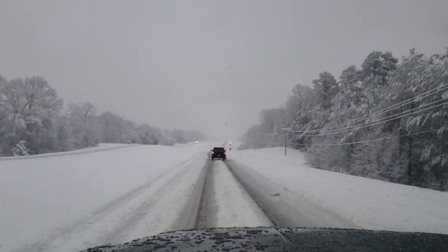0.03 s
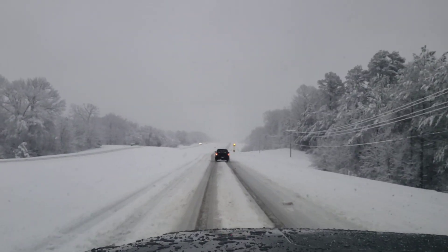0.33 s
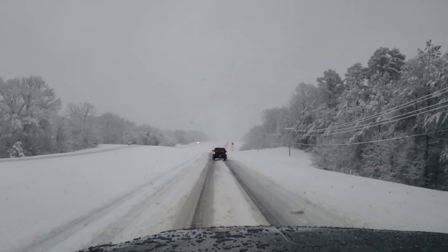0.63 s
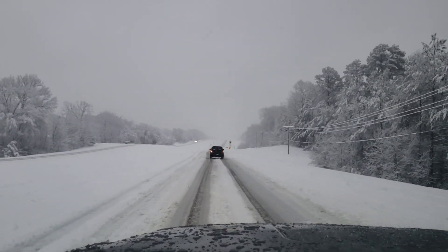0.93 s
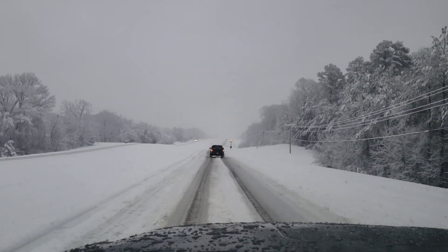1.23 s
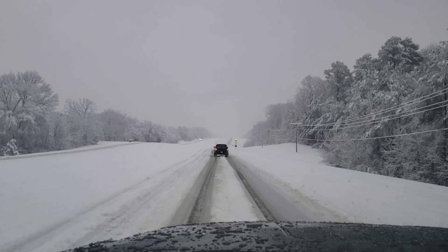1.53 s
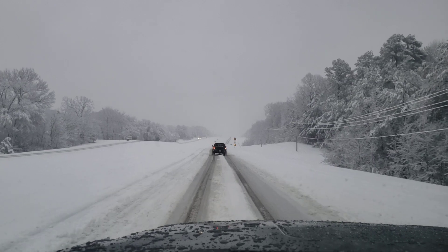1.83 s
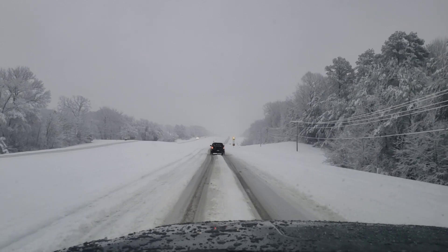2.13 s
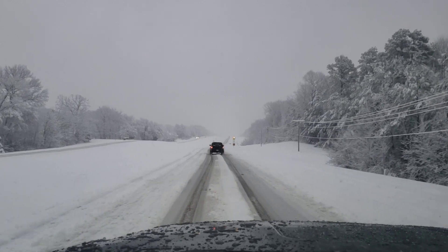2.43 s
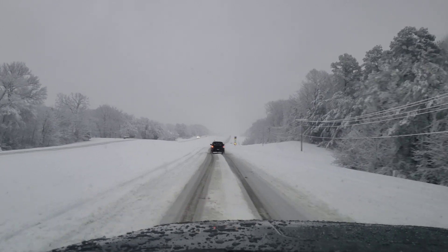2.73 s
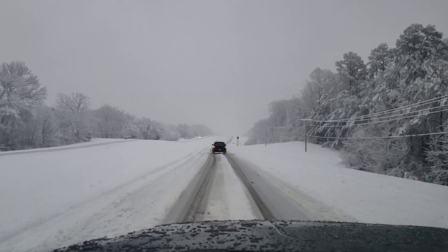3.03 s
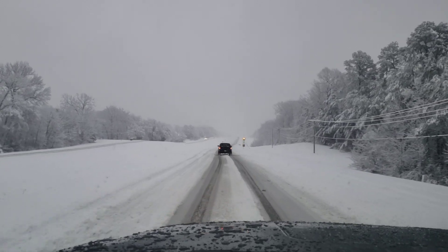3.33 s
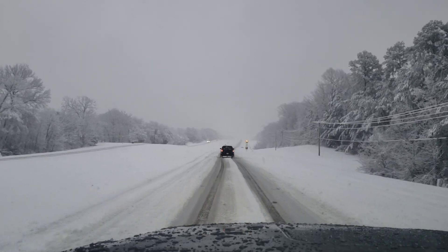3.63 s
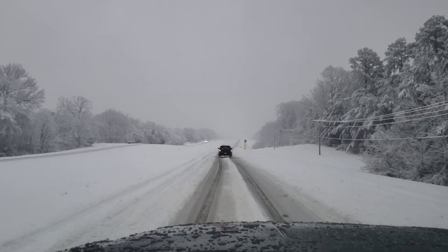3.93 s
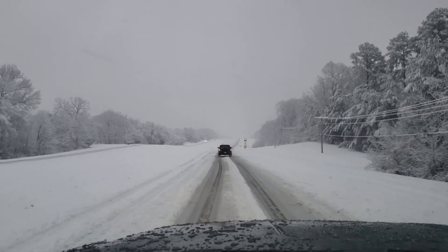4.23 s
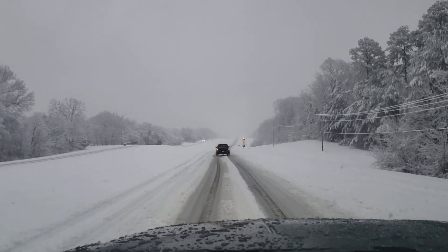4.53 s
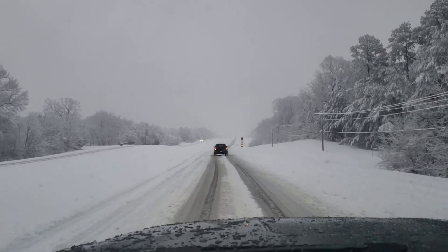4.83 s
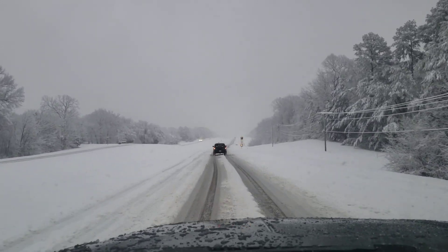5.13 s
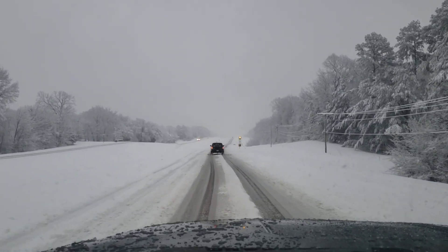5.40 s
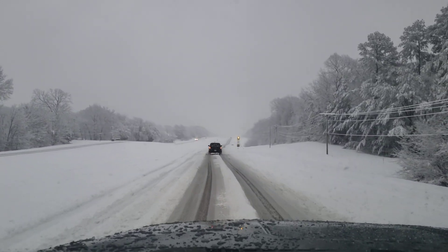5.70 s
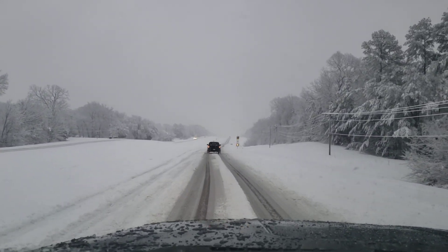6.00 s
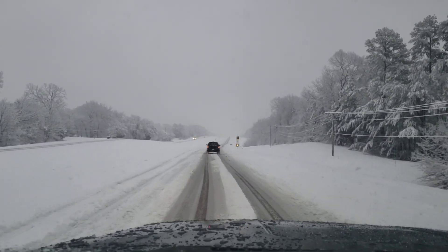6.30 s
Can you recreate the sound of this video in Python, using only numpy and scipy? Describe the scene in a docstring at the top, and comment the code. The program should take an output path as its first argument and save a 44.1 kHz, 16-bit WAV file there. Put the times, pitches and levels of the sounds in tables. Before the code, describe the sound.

Inside a car driving through slush: a steady deep rumble and wet tyre hiss, with drops ticking on the windscreen and ice hitting the body.

```python
"""Driving through slush

Inside a car, just behind the windscreen. The rough road shakes the cabin into a deep rumble,
and the turning engine and wheels hum through it. The tyres throw up countless wet grains,
which blur into a hiss. Drops tick on the glass, and gritty splashes and bits of ice hit the
body. Near the end, the right wheels plough into deeper slush."""
import sys
import numpy as np
from scipy import signal
from scipy.fft import rfft, irfft
from scipy.io import wavfile
from scipy.ndimage import uniform_filter1d

SR = 44100
rng = np.random.default_rng(int(sys.argv[2]) if len(sys.argv) > 2 else 0)


def to_wav(s):
    """Save 16-bit WAV."""
    ch = np.atleast_2d(s).T  # columns
    pcm = np.round(np.clip(ch, -1, 1) * 32767)  # PCM
    wavfile.write(sys.argv[1], SR, pcm.astype(np.int16))


N = 284886
TIME = np.arange(N) / SR
FREQS = np.maximum(np.fft.rfftfreq(N, 1 / SR), 1)
CUTOFF_HZ = 15700

# Rough packed snow. Each row: time in seconds, shaking in dB.
ROAD_SHAKING = [(0, -10), (.6, -4.5), (1.1, -0.5), (1.65, 0), (2.1, -0.5), (2.75, -2), (3.05, 0.1),
                (4.1, 2.5), (4.45, -2), (5.3, -2), (6.05, -1.5), (6.46, -2.5)]
# Ridges of snow. Each row: time in seconds, change in shaking in dB.
SNOW_RIDGES = [(1.65, 4.5), (4.62, 10), (4.82, 8), (5.5, -2)]
# Turning parts. Each row: time in seconds, turns per second, level in dB.
ENGINE_TURNS = [(0, 39, -36.5), (.4, 37.8, -39.5), (.8, 40.8, -40.5), (1.2, 39, -47), (2, 42.2, -46),
                (3, 39.9, -40), (4, 37.3, -38), (4.5, 37.7, -43), (5, 38, -42), (5.6, 37, -36),
                (6.46, 37.5, -38)]
WHEEL_TURNS = [(0, 13.7, -45), (.8, 12.1, -40.5), (1.5, 13.4, -39), (2.7, 12.54, -37.5), (3.7, 14.7, -41.5),
               (4.5, 12.3, -40), (5.5, 13.37, -37), (6.46, 12.7, -37.5)]
# Their tones. Each row: multiple of the turning speed, level in dB.
ENGINE_TONES = [(1, -25), (2, 0.5), (4, -10.5), (6, -13.5), (7, -16), (9, -22.5)]
WHEEL_TONES = [(2, -37), (3, -2), (4, -5.5), (5, 0), (6, -10), (12, -9.5), (14, -12), (16, -14),
               (21, -15.5), (25, -21)]  # from uneven tyres and tread blocks
# How alike left and right sound. Each row: frequency in Hz, likeness from 0 to 1.
SIDE_LIKENESS = [(60, 0.86), (160, 0.99), (270, 0.83), (450, 0.77), (800, 0.23)]

# Things that swell and fade. Each row: time in seconds, level in dB.
SLUSH_FLOW = [(0, -3.5), (.55, -2.5), (1.2, 0.8), (1.5, 0.2), (2.1, -1), (2.7, 0), (3.35, 0.5), (3.6, 0),
              (4.2, 0.2), (5.15, -0.1), (5.5, -0.84), (6.12, -0.3), (6.3, 1.5), (6.46, 1)]  # wet snow thrown up by the tyres
PLOUGH_LEVEL = [(6.1, -75), (6.18, -52), (6.24, -47), (6.32, -44), (6.38, -49), (6.44, -42), (6.46, -38)]
CRACKLE_LEVEL = [(0, -50), (.4, -56), (.6, -61), (.85, -51), (.97, -53), (1.2, -52), (1.45, -56),
                 (1.9, -53.5), (6.46, -56.5)]
PANEL_LEVEL = [(0, -59), (.45, -48), (1.3, -44.5), (2.1, -51), (2.85, -49), (3.6, -65), (5, -46.5),
               (6.46, -54.5)]
SHUDDER_LEVEL = [(0, -52), (1.2, -52), (1.68, -29), (2.15, -42), (2.8, -61), (3.1, -33.5), (3.5, -43),
                 (4.05, -36), (4.5, -53), (5.7, -53), (6.46, -41)]

# Spurts of sizzle from puddles. Each row: time in seconds, boost on the left in dB, boost on
# the right in dB, half length in seconds.
PUDDLE_SPURTS = [(1.383, -0.5, 2, .018), (4.76, 3, 3.5, .02), (4.98, 0, 2, 0.014), (5.106, -2, 4, 0.0087),
                 (5.165, 3, 5.5, 0.011), (5.998, 4.5, 3, 0.01)]
# Drops on the glass. Each row: start in seconds, level in dB, brightness in dB per octave,
# travel time of the 1000 Hz wave in milliseconds, then a boost in dB for each of the LANDING_BANDS.
GLASS_DROPS = [(0.3184, -10, -9, 2.06, -11, 0, 0, 0), (0.9955, -1.5, -8, 2.1, -3, -5, 7, 4),
               (1.563, -17, -5, 2.3, -9, 10, 2, 0), (2.2703, -1.6, -5.2, 2.35, -4.5, -3.5, 5, 5),
               (2.488, -0.5, -3.5, 2.1, 2, -7, 7, 5.5), (2.9253, -1.6, -2, 2.3, -3, -4, 5.5, 7),
               (3.268, -1.5, 0.3, 2.25, 10, 2.5, 0, -1.5), (3.4035, 0.7, -6.5, 2.7, -7, 4.5, -3, -3),
               (3.885, -1.7, -2, 2.1, 6, 5, 3, 2)]
# Pitch ranges whose strength depends on where a drop lands. Each row: centre in Hz, width in Hz.
LANDING_BANDS = [(442, 170), (655, 170), (800, 110), (1920, 130)]
# Slush on the body. Each row: time in seconds, splat in dB, crunch in dB, half length in seconds.
BODY_SPLASHES = [(1.927, -40.5, -52, 0.0074), (2.546, -41, -60, 0.0052), (4.582, -36.5, -47, 0.0079),
                 (4.623, -37, -50, 0.0084), (4.717, -37, -51, 0.0098), (4.744, -51, -42, 0.0065),
                 (4.765, -37, -42, 0.005), (4.798, -36, -40, 0.0039), (4.832, -33, -48, 0.008),
                 (4.992, -41, -43, 0.0051), (5.123, -35, -51, .005), (6.078, -35.5, -51, 0.007),
                 (6.28, -48, -49, 0.005), (6.375, -38, -53, 0.02)]
# Ice on the body. Each row: start in seconds, level in dB, pitch in Hz.
ICE_HITS = [(1.9235, -33, 1100), (4.5842, -39, 1500), (4.7165, -34, 1500), (4.767, -31, 1600),
            (4.7978, -30, 1750), (4.8035, -32, 1000), (4.8295, -30, 1200), (4.8383, -24, 1500),
            (4.9865, -33, 1400), (5.0005, -35, 1900), (5.1215, -31, 1100), (6.0827, -31, 1100),
            (6.1758, -24, 1250)]
# Gushes in deep slush. Each row: time in seconds, level in dB, half length in seconds.
SLUSH_GUSHES = [(6.21, -55, .006), (6.275, -47, 0.0078), (6.337, -38.5, 0.0058), (6.388, -55, 0.0063),
                (6.425, -44.5, 0.0083)]

# Pitches at which things ring. Each row: pitch in Hz, width in Hz, strength in dB.
GLASS_RINGS = [(449, 82, 6), (623, 21, -4), (768, 21, -6), (977, 110, -3.5), (1873.5, 120, 6.5),
               (3160, 370, -2.5), (3800, 380, -3.5)]
LEFT_RINGS = [(832, 53, -4), (1079, 87, 6.5), (1348, 66, -1), (1890, 220, -8.5), (2650, 46, -17)]  # glass and dashboard, as heard on each side
RIGHT_RINGS = [(1177, 18, 13), (1523, 91, 13), (1820, 360, 10), (2165, 200, 4.5), (2500, 150, -9),
               (4970, 150, -7.5)]

# A colour says how strong a sound's low and high parts are. Each row: frequency in Hz, level in dB.
BOOM_COLOUR = [(14, -31), (24, -17), (38, -15), (47, 1.5), (62, 6.5), (69, 8), (77, 12), (90, -0.5),
               (120, -5.5), (170, -21)]  # cabin air
DRONE_COLOUR = [(70, -6.5), (105, 2.5), (160, 0.5), (230, -3.5), (280, -9), (350, -13.5), (450, -16),
                (600, -26.5), (1000, -59)]  # body panels
LEFT_HISS_COLOUR = [(200, -6), (480, -5), (680, -8), (1100, -9.5), (1600, -2), (2300, -2.5), (2900, -12),
                    (3400, -12.5), (4000, -19.5), (5150, -21.5), (6300, -36.5), (7500, -62), (9500, -48),
                    (15700, -46.5)]
RIGHT_HISS_COLOUR = [(250, -18), (520, -9.5), (980, -15.5), (1300, -16), (1600, -22.5), (2500, -13.5),
                     (2750, -15.5), (3150, -26.5), (4500, -12), (5050, -12), (5700, -14.5), (6300, -26.5),
                     (6800, -41), (8000, -66)]
SPRAY_COLOUR = [(6400, -30), (6800, -12), (7400, -3.5), (8000, -2.5), (9100, -7), (10500, -4.5),
                (12000, 2.5), (13200, -5.5), (14400, -14), (14900, -27), (15400, -50)]
GLASS_COLOUR = [(200, -29), (320, -13), (430, -6), (600, -10), (700, -9.5), (800, -5.5), (1050, -2),
                (1170, -11.5), (1450, -6), (1900, -12.5), (2450, -11.5), (3300, -8.5), (4200, -12.5),
                (4450, -22), (5700, -16), (6200, -44), (7500, -64)]
SPLAT_COLOUR = [(400, -11), (750, 7), (1200, 12), (1800, 0), (2500, -5), (3300, -13), (5000, -29),
                (7000, -50)]
ICE_CRUNCH_COLOUR = [(1400, 4), (1800, 6), (2100, -5), (2500, 5.5), (3100, -6), (4200, -9), (6000, -32)]
DEEP_SLUSH_COLOUR = [(1000, -3), (1300, -1), (1600, -12), (2200, 3), (2550, 2), (2800, -7), (3200, -23),
                     (3600, -11), (4500, -4), (4800, -8), (5000, 5), (5350, -15), (5700, -5), (6300, -20),
                     (6800, -45)]
ARCH_GUSH_COLOUR = [(2200, -22), (2420, -4), (2540, -6), (2650, 0), (2850, -24)]  # the wheel arch ringing
ARCH_CRACKLE_COLOUR = [(1850, -22), (2060, -4), (2180, 3.5), (2290, -2), (2480, -21)]
PANEL_RING_COLOUR = [(245, -15), (272, 1), (290, -4.5), (325, -14)]
SUSPENSION_COLOUR = [(20, -12), (30, -5), (40, -3.5), (55, 1), (68, -18)]

# How a sound changes on its way. Each row: frequency in Hz, change in dB.
TICKS_TO_RIGHT = [(150, -12), (450, -29), (640, -39), (790, -17), (1000, -17), (2300, -21), (3200, -32),
                  (5000, -20), (7000, -10)]
PLOUGH_TO_LEFT = [(1100, 10), (1500, 2), (2200, -6), (2700, -5), (3300, -2), (4000, -10), (5000, -19),
                  (6800, -16)]
ICE_TO_CABIN = [(350, 2), (600, 0), (2300, -6), (3200, -10), (6000, -25)]


def road_rumble():
    """The road shakes the car: the air booms, and the panels drone more steadily."""
    shaking_db = in_time(ROAD_SHAKING)[0] + sum(db * bell(s, half_s=0.02) for s, db in SNOW_RIDGES)
    boom = from_db(-33 + shaking_db) * evened(cabin_noise(BOOM_COLOUR), span_s=0.18)
    drone = from_db(-37 + 0.27 * shaking_db) * evened(cabin_noise(DRONE_COLOUR), span_s=0.15)
    return boom + drone


def turning_hum(turns, tones, wander, flutter_db, flutter_hz):
    """A turning part hums at multiples of its speed, and each tone wavers in loudness."""
    speed, level_db = in_time(turns)
    angle = 2 * np.pi * np.cumsum(speed * (1 + wander * drift(2.68))) / SR
    hum = 0
    for multiple, db in tones:
        strength = from_db(db + flutter_db * drift(flutter_hz))
        hum += strength * np.sin(multiple * angle + rng.uniform(0, 2 * np.pi))
    return np.sqrt(2) * from_db(level_db) * hum


def tyre_hiss():
    """Countless slush grains hit the wheel arches in surges; water adds sizzle and fine spray."""
    flow_db, = in_time(SLUSH_FLOW)
    spurt_db = sum(np.outer(sides_db, bell(s, half_s)) for s, *sides_db, half_s in PUDDLE_SPURTS)
    surge_db = 0.72 * drift(10)
    left, right = grains(per_s=15000, spread_db=1.0) * from_db(surge_db + 0.36 * drift(30))
    # The left grains also reach the right side, a little later.
    right = rms_one(right + from_db(-10) * np.interp(TIME - .00028, TIME, left))
    hiss = np.array([coloured(left, LEFT_HISS_COLOUR), coloured(right, RIGHT_HISS_COLOUR)])
    hiss = rms_one(irfft(rfft(hiss) * [ringing(LEFT_RINGS), ringing(RIGHT_RINGS)], N))
    # With more slush, sizzle and spray grow faster than the hiss.
    treble = coloured(hiss, [(2300, 0), (CUTOFF_HZ, 0)])
    sizzle = (from_db(0.36 * flow_db + spurt_db) - 1) * treble
    spray = rms_one(coloured(grains(per_s=26000, spread_db=0), SPRAY_COLOUR))
    spray *= from_db(-67.5 + 1.4 * flow_db + 0.98 * spurt_db + surge_db)
    return from_db(-42 + flow_db) * (hiss + sizzle) + balanced(spray, left_db=-25, right_db=5.2)


def windscreen_ticks():
    """Drops of slush land on the glass, left of centre, and set it ringing."""
    blows = sum(drop(*row) for row in GLASS_DROPS)
    left = from_db(13.5) * irfft(blows * ringing(GLASS_RINGS) * struck(GLASS_COLOUR), N)
    right = coloured(left, TICKS_TO_RIGHT)
    ticks = placed(np.array([left, right]), pan_db=-0.5, lag_ms=-0.22)
    return with_echoes(ticks, count=6, earliest_s=0.00263, latest_s=0.016, echo_db=-26.5)


def drop(start_s, level_db, brightness_db, travel_ms, *boosts_db):
    """One drop's frequencies: it has its own loudness and brightness; its landing spot shapes them."""
    octaves = np.log2(np.clip(FREQS, 300, 5000) / 1000)
    blow = from_db(level_db + brightness_db * octaves) * delay(start_s)
    for db, (hz, width) in zip(boosts_db, LANDING_BANDS):
        blow *= 1 + (from_db(db) - 1) / (1 + 2j * (FREQS - hz) / width)
    # High notes cross the glass faster, so each tick chirps downward.
    phase = 4 * np.pi * travel_ms * np.sqrt(FREQS / 1000)
    direct = np.exp(-1j * phase)
    # The wave comes back from the rim, later and duller.
    from_rim = from_db(-12) * np.exp(-1j * phase * 1.887) / (1 + (FREQS / 2600) ** 2)
    return blow * (direct + from_rim)


def splashes():
    """Clumps of slush burst on the body: a dull splat on the left and a brighter crunch of ice."""
    splat = sum(from_db(db) * bell(s, half_s) for s, db, _, half_s in BODY_SPLASHES)
    crunch = sum(from_db(db) * bell(s, half_s) for s, _, db, half_s in BODY_SPLASHES)
    wet = evened(coloured(grains(per_s=6200, spread_db=1.0), SPLAT_COLOUR), span_s=0.0042)
    icy = evened(coloured(grains(per_s=2500, spread_db=0.5), ICE_CRUNCH_COLOUR), span_s=0.045)
    return balanced(splat * wet, right_db=-10) + balanced(crunch * icy, right_db=-2)


def ice_cracks():
    """Bits of ice hit the left side, each with a ring that dies almost at once."""
    path, cracks = struck(ICE_TO_CABIN), 0
    for start_s, db, hz in ICE_HITS:
        ring = 1 / (1 + 1j * (FREQS / hz - hz / FREQS))
        crack = irfft(path * delay(start_s) * ring, N)
        cracks += from_db(db) * crack / np.abs(crack).max()
    cracks = coloured(cracks, [(300, 0), (5500, 0)])
    return balanced(placed(cracks, pan_db=1, lag_ms=-0.17), left_db=2, right_db=-13)


def plough():
    """Wheels in deeper slush throw a gritty sheet of it at the right side of the car."""
    level_db = np.interp(TIME, *np.transpose(PLOUGH_LEVEL), left=-120) + drift(25)
    left, right = rms_one(coloured(grains(per_s=2700, spread_db=-0.5), DEEP_SLUSH_COLOUR))
    return from_db(level_db) * np.array([coloured(left, PLOUGH_TO_LEFT), right])


def gushes():
    """Short gushes in that sheet of slush make the wheel arch ring."""
    level = sum(from_db(db) * bell(s, half_s) for s, db, half_s in SLUSH_GUSHES)
    ring = evened(coloured(grains(per_s=2500, spread_db=-1.0), ARCH_GUSH_COLOUR), span_s=0.015)
    return balanced(level * ring, left_db=-2, right_db=1)


def crackle():
    """Coarser wet grains rattle in the wheel arch, in small surges."""
    level_db = in_time(CRACKLE_LEVEL)[0] + 2 * drift(1.4)
    rattle = rms_one(coloured(grains(per_s=500, spread_db=-1.0), ARCH_CRACKLE_COLOUR))
    return balanced(from_db(level_db) * rattle, right_db=-6)


def bodywork():
    """A panel rings with the tyre tread, and the suspension shudders over rutted snow."""
    panel = from_db(in_time(PANEL_LEVEL)[0]) * evened(cabin_noise(PANEL_RING_COLOUR), span_s=0.13)
    shudder = from_db(in_time(SHUDDER_LEVEL)[0]) * evened(cabin_noise(SUSPENSION_COLOUR), span_s=0.081)
    return placed(panel + shudder, pan_db=2.5, lag_ms=-0.054)


def with_echoes(x, count, earliest_s, latest_s, echo_db):
    """Glass and dashboard return a few close echoes, different on each side."""
    echoes = 0
    for k, delays in enumerate(rng.uniform(earliest_s, latest_s, (count, 2))):
        echo = np.array([np.interp(TIME - s, TIME, side, left=0) for s, side in zip(delays, x)])
        echoes += echo * (-1) ** k  # every second echo is flipped
    return x + from_db(echo_db) * echoes


def cabin_noise(colour):
    """Long waves fill the cabin and reach both sides alike; short ones differ."""
    alike = np.clip(at_hz(SIDE_LIKENESS, FREQS), 0, .995)
    shared, opposed = rfft(coloured(rng.standard_normal((2, N)), colour))
    return rms_one(irfft(np.sqrt(1 + alike) * shared + np.sqrt(1 - alike) * opposed * [[1], [-1]], N))


def grains(per_s, spread_db):
    """Tiny random hits of uneven size, on both sides."""
    sizes = from_db(spread_db * np.minimum(rng.exponential(1, (2, N)), 4))
    hits = rng.random((2, N)) < per_s / SR
    return rms_one(hits * sizes * rng.standard_normal((2, N)))


def coloured(x, colour):
    """Give a sound a colour, fading steeply beyond the ends of its table."""
    octaves_outside = np.abs(np.log2(FREQS / np.clip(FREQS, colour[0][0], colour[-1][0])))
    gain = from_db(at_hz(colour, FREQS) - 40 * octaves_outside)
    return irfft(rfft(x) * gain, N)


def ringing(rings):
    """A filter that lets sound through and adds a few ringing pitches."""
    return 1 + sum(from_db(db) / (1 + 2j * (FREQS - hz) / width) for hz, width, db in rings)


def struck(colour):
    """A filter for an object that rings only after it is hit, never before."""
    cepstrum = irfft(np.log(from_db(at_hz(colour, FREQS))), N)  # the colour, laid out in time
    return np.exp(rfft(cepstrum * (1 + np.sign(np.fft.fftfreq(N)))))


def delay(s):
    """A filter that makes a sound come s seconds later."""
    return np.exp(-2j * np.pi * FREQS * s)


def placed(x, pan_db, lag_ms):
    """Make the left side louder by pan_db and later by lag_ms (earlier if negative)."""
    left, right = np.broadcast_to(x, (2, N))
    left = np.interp(TIME - lag_ms / 1000, TIME, left)
    return balanced(np.array([left, right]), pan_db / 2, -pan_db / 2)


def balanced(x, left_db=0, right_db=0):
    """Turn each side up or down."""
    return x * from_db([[left_db], [right_db]])


def evened(x, span_s):
    """Hold the short-term power of a noise at one."""
    return x / np.sqrt(uniform_filter1d(np.mean(x ** 2, axis=0), int(span_s * SR)))


def drift(hz):
    """A random wobble of about size one, mostly slower than hz."""
    return rms_one(irfft(rfft(rng.standard_normal(N)) / (1 + (FREQS / hz) ** 2), N))


def bell(s, half_s):
    """A smooth rise to one and fall back, centred on second s."""
    return np.exp(-.5 * ((TIME - s) / half_s) ** 2)


def in_time(rows):
    """Join a table's rows into curves over time, one for each value column."""
    s, *columns = np.transpose(rows)
    return [np.interp(TIME, s, column) for column in columns]


def at_hz(rows, hz):
    """Read between a table's rows, with octaves evenly spaced."""
    frequencies, values = np.transpose(rows)
    return np.interp(np.log(hz), np.log(frequencies), values)


def from_db(db):
    """Turn decibels into a multiplier."""
    return 10 ** (np.asarray(db) / 20)


def rms_one(x):
    """Scale a sound to an average power of one."""
    return x / np.sqrt(np.mean(x ** 2) + 1e-20)


def scene():
    """Everything heard in the cabin."""
    road = road_rumble()
    engine = turning_hum(ENGINE_TURNS, ENGINE_TONES, wander=0.0036, flutter_db=1.5, flutter_hz=2.2)
    wheels = turning_hum(WHEEL_TURNS, WHEEL_TONES, wander=0.0035, flutter_db=3.0, flutter_hz=1.7)
    car = placed(road + engine + wheels, pan_db=2.5, lag_ms=-0.059) + bodywork()
    slush = tyre_hiss() + crackle() + plough() + gushes()
    return car + slush + windscreen_ticks() + splashes() + ice_cracks()


def record(dry):
    """Fade both ends over a few milliseconds and cut off the highest treble."""
    eased = dry * signal.windows.tukey(N, .002)
    return signal.sosfilt(signal.ellip(10, .1, 80, CUTOFF_HZ, fs=SR, output="sos"), eased)


dry = scene()
out = record(dry)
to_wav(out)
```